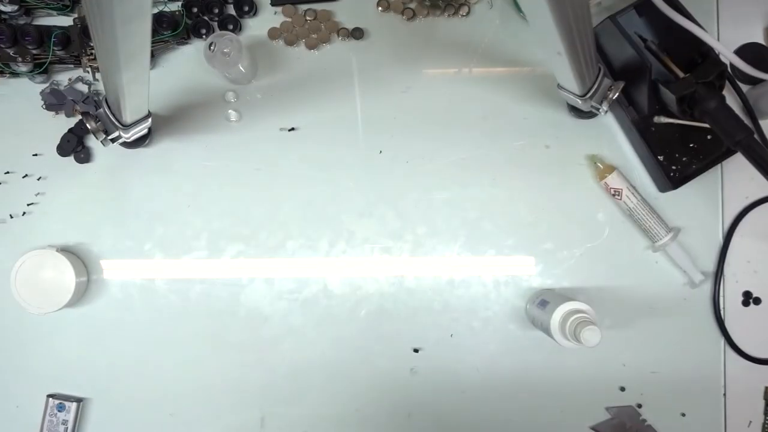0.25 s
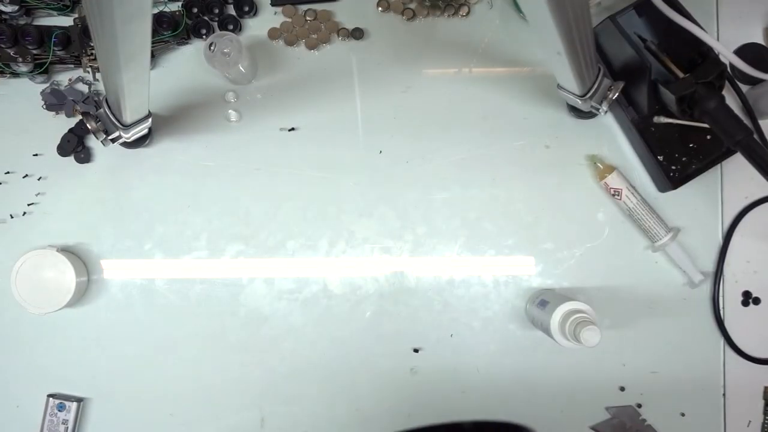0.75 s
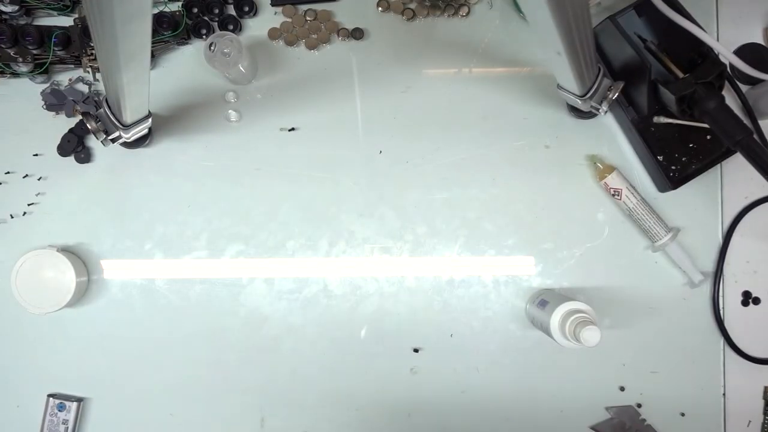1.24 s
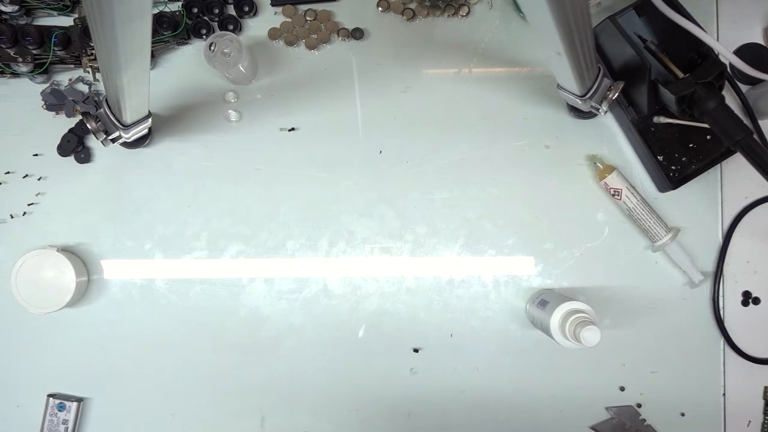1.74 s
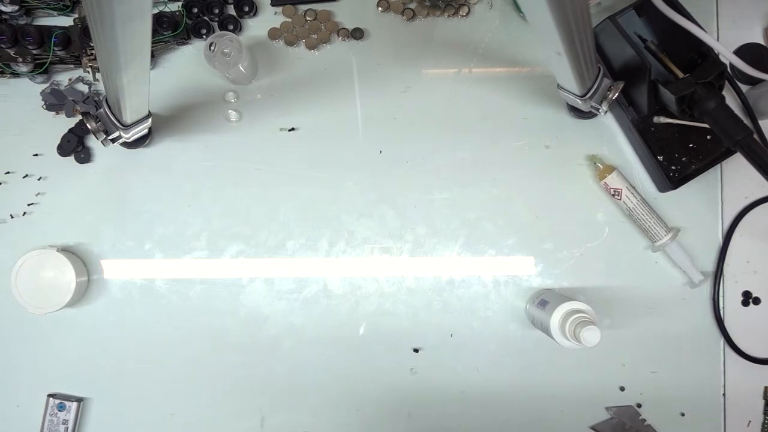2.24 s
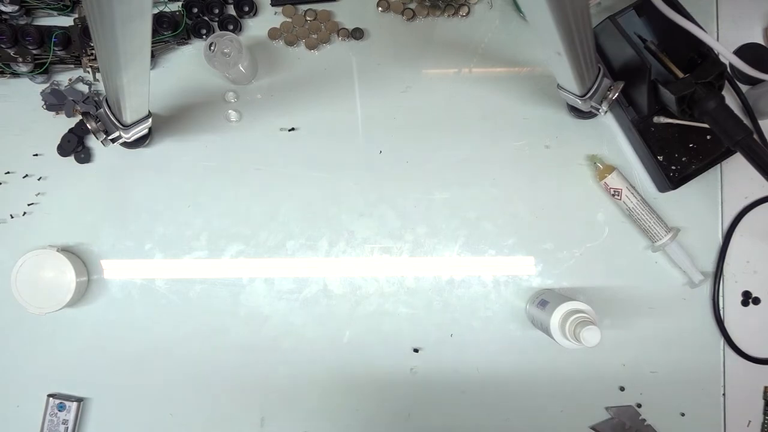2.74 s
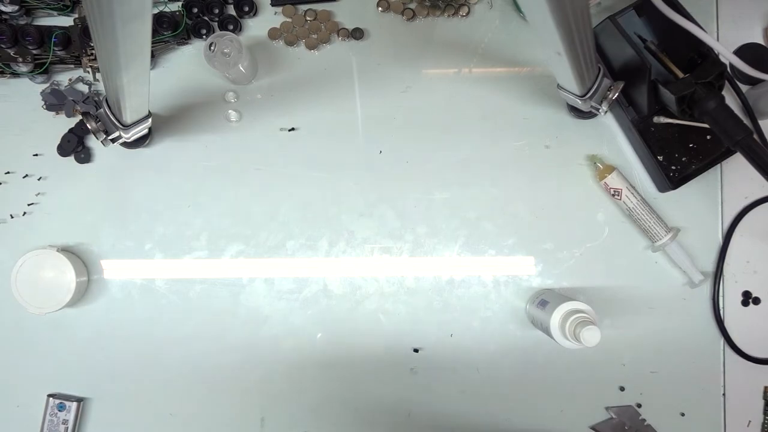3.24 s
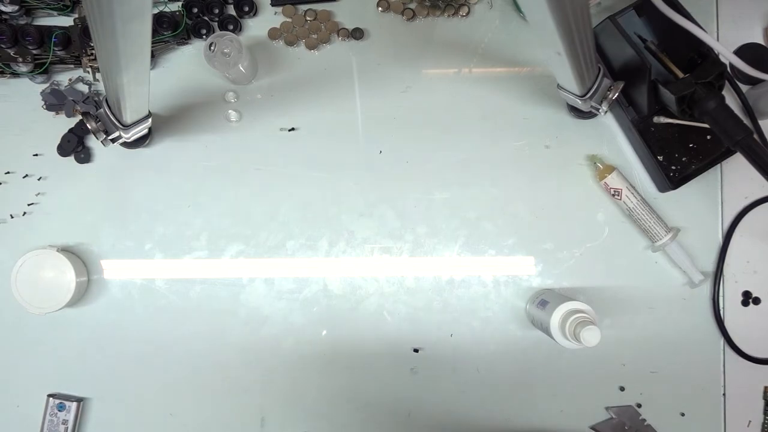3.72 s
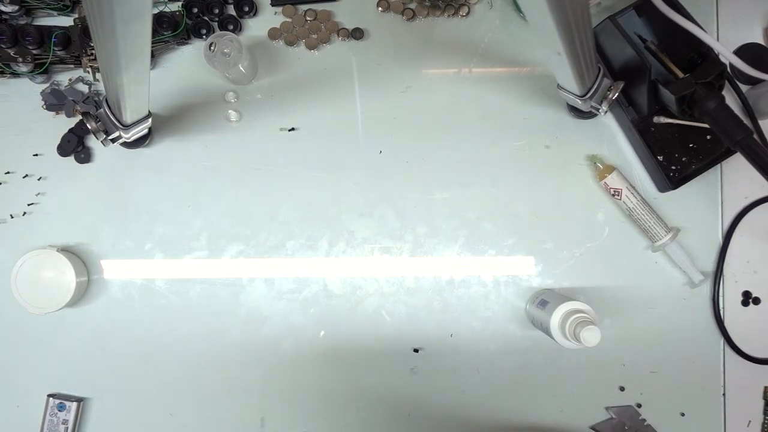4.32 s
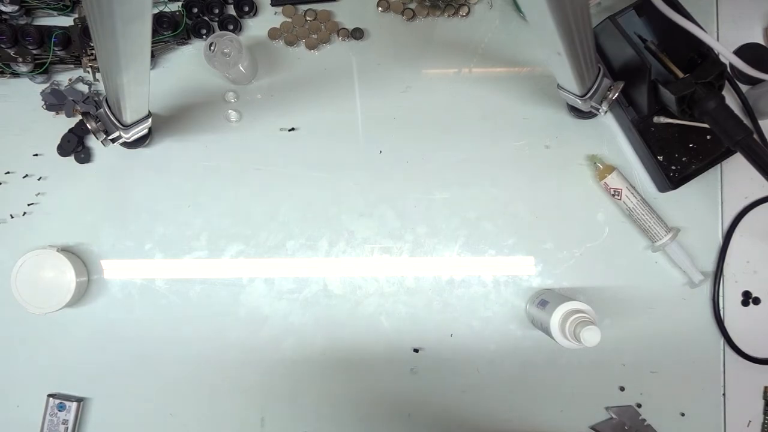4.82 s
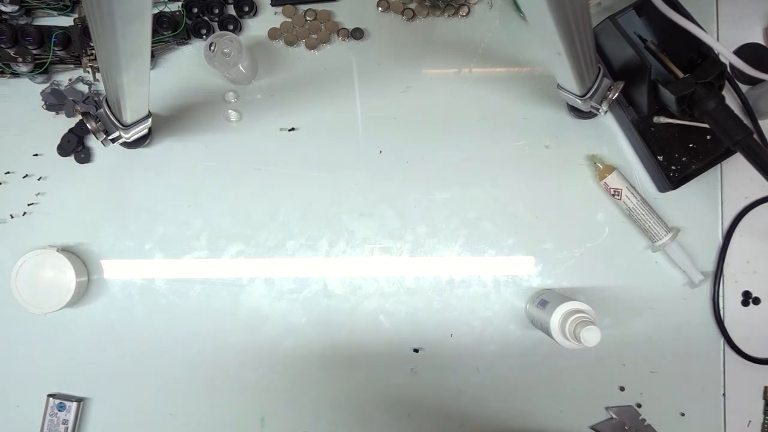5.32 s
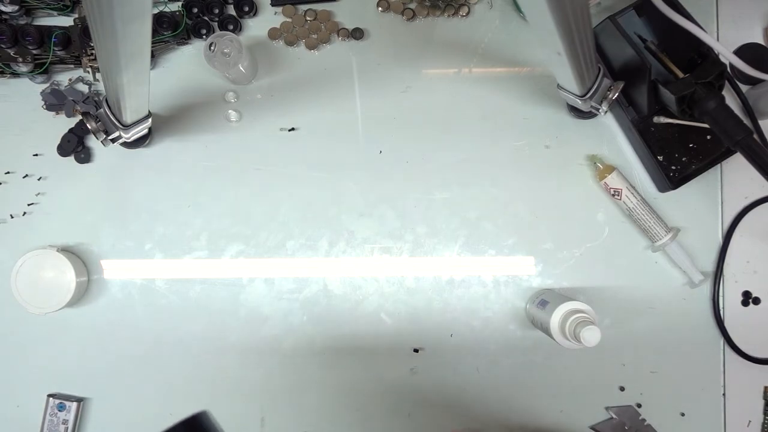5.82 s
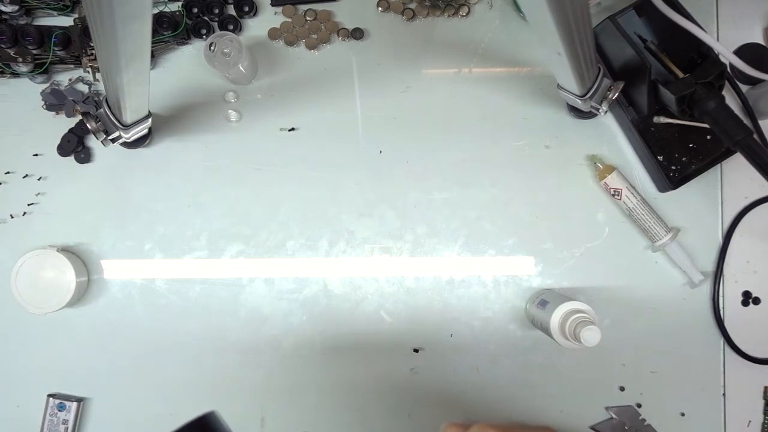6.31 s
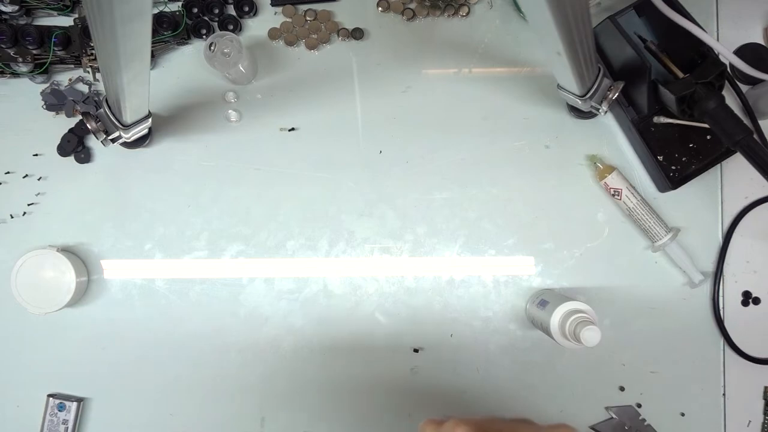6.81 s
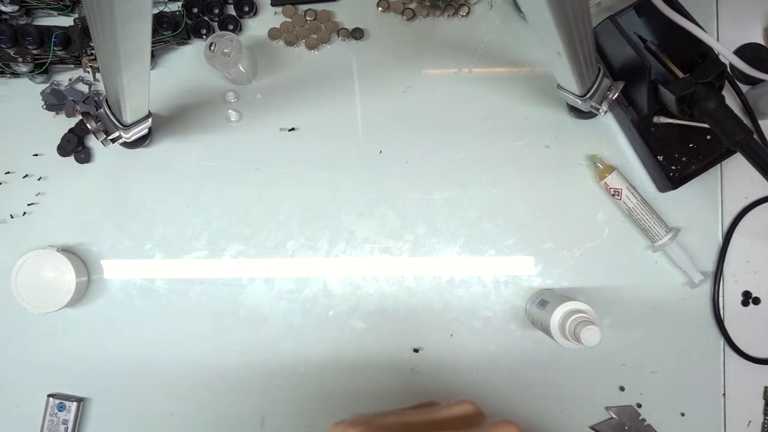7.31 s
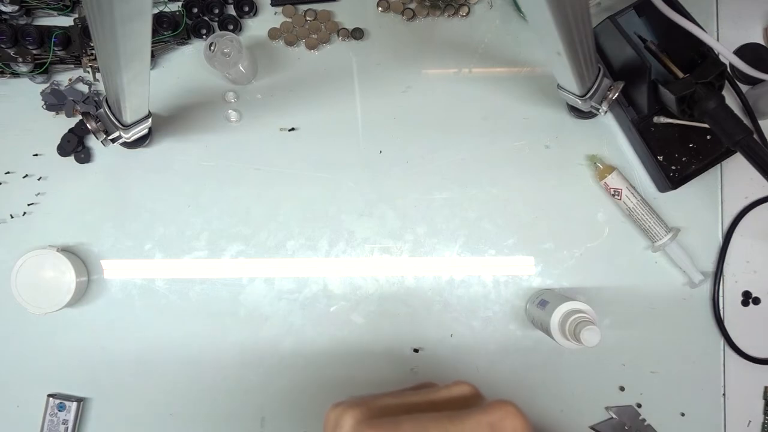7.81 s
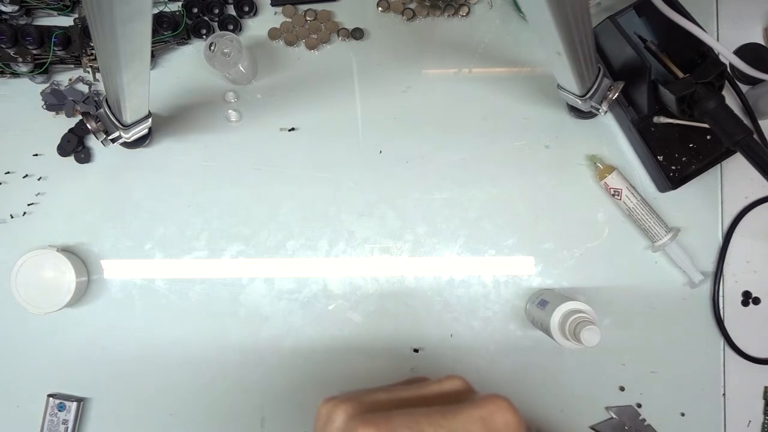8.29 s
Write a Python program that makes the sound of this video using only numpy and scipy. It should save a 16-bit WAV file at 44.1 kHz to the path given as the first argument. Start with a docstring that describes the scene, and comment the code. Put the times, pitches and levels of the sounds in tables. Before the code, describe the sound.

Very close, a small lens motor drives plastic gears in seven short runs over about eight seconds, alternating outward and inward. Each is a grainy, whining buzz that starts abruptly, holds nearly steady and stops with a tiny dull thud. Brief clicks and gear chatter fall in the gaps. Behind lie a quiet workshop's low rumble and faint hum, with barely audible finger rustles and one distant hoot near the end.

```python
"""Camera lens hunting for focus

On a workbench, a tiny motor drives a plastic gear train in seven short runs, outward and inward by turns.
Teeth knock, rub and whine; a tight spot on one wheel makes the speed wobble, more strongly inward.
Each run overshoots, cruises and sags a little. Around the runs the motor twitches, and after some stops
it brakes and corrects. Fingers rustle on the barrel. Behind it: room rumble, hum and one faint far hoot."""
import sys
import numpy as np
from scipy import signal
from scipy.fft import rfft, irfft, next_fast_len
from scipy.io import wavfile
from scipy.ndimage import uniform_filter1d

SR = 44100
rng = np.random.default_rng(int(sys.argv[2]) if len(sys.argv) > 2 else 0)


def master_out(mix):
    """Clip the mix to full scale and print it as 16-bit PCM to the path in sys.argv[1]."""
    frames = np.transpose(np.atleast_2d(mix))
    ceiling = np.clip(frames, -1, 1)
    pcm = np.round(ceiling * 32767).astype(np.int16)
    wavfile.write(sys.argv[1], SR, pcm)


N = 377047
TIME = np.arange(N) / SR  # seconds

TEETH = 7  # tooth contacts per shaft turn
BRAKE_LEAD_S = 0.088  # the brake current comes on this long before a correcting nudge

# resonances of the lens barrel: (pitch_hz, width_hz, driven_outward_db, driven_inward_db)
BARREL_RESONANCES = [(310, 27, 8.5, -6.5), (1388, 104, 11, 9), (1988, 138, 12, 15), (2784, 500, 6.5, 4.5),
                     (3220, 51, 6, 6), (4720, 190, -4, 6.5), (5120, 200, 1.5, 6.5), (6070, 600, 4, 5.5),
                     (6980, 720, 9.5, 13), (8540, 103, 7, 10), (9210, 450, 1.5, 7), (10060, 280, 4, 1.5),
                     (12800, 370, 0, 9.5), (13400, 390, -3.5, -4.5)]
# correcting nudges after a braked stop: (start_s, level_db)
CORRECTING_NUDGES = [(.962, -47), (1.555, -48.5), (2.521, -53.5), (3.834, -49), (5.86, -46.5)]


def gain_of(db):
    """Turns decibels into amplitude."""
    return 10 ** (np.asarray(db) / 20)


def evened(x):
    """Scales a signal to rms 1."""
    return x / np.sqrt(np.mean(x ** 2) + 1e-20)


def read(points, hz):
    """Reads a curve between its points, on a log-frequency axis."""
    f, value = np.transpose(points)
    return np.interp(np.log(hz + 1), np.log(f + 1), value)


def bell(t, centre, width):
    """A smooth hump of height 1."""
    return np.exp(-((t - centre) / width) ** 2)


def drift(rate_hz):
    """Smooth random motion of rms 1, up to about the given rate."""
    size = next_fast_len(N, real=True)
    hz = np.arange(0, 3 * rate_hz, SR / size)
    phases = np.exp(2j * np.pi * rng.random(size // 16)[:len(hz)])
    spectrum = phases * np.exp(-(hz[:len(phases)] / rate_hz) ** 2)
    return evened(irfft(spectrum, size)[:N])


def workshop(air_db=-51.5, hoot_hz=571, waver_db=0.97):
    """Room rumble is filtered noise; the hum and the far hoot are sines that waver."""
    # colour of the room rumble: (pitch_hz, relative_level_db)
    rumble_colour = [(12, -42), (20, -2), (54, 1.5), (92, -14), (122, -4.5), (175, -18.5), (245, -16.5),
                     (362, -24.5), (439, -25), (705, -27.5), (906, -32), (1230, -30), (1670, -36.5),
                     (6020, -43.5), (15500, -46.5)]
    # hum of appliances: (pitch_hz, level_db, wander_hz)
    hum_tones = [(48.8, -63.5, 4.3), (78.2, -63, 3), (119.9, -58.5, 0.56), (201.2, -74.5, 1.91),
                 (242.6, -78.5, 1.04), (282.5, -73, 2.67), (314.5, -74.5, 3.17), (353.7, -74, 2.13),
                 (1249, -76, 5.1)]
    # loudness of the hoot over time: (time_s, level_db)
    hoot_levels = [(7.03, -66), (7.12, -67), (7.18, -53.5), (7.24, -58), (7.31, -67), (7.42, -75)]

    hz = np.fft.rfftfreq(N, 1 / SR)
    noise = rfft(rng.standard_normal(N))
    air = evened(irfft(noise * gain_of(read(rumble_colour, hz)), N))

    hum = np.zeros(N)
    for f, db, wander in hum_tones:
        level = gain_of(db + waver_db * drift(2.8))
        hum += level * np.sin(2 * np.pi * np.cumsum(f + wander * drift(23.4)) / SR)

    # silent before the first point and after the last
    hoot_db = np.interp(TIME, *np.transpose(hoot_levels), left=-np.inf, right=-np.inf)
    hoot = gain_of(hoot_db) * np.sin(2 * np.pi * hoot_hz * TIME + drift(30))
    return gain_of(air_db) * air + np.sqrt(2) * (hum + hoot)


def barrel(x, knock, peaks_db, size=4096):
    """Rings impacts through the lens barrel: a filter with its resonances that never sounds early."""
    hz = abs(np.fft.fftfreq(size, 1 / SR))
    db = read(knock, hz)
    for (f, width, *_), peak in zip(BARREL_RESONANCES, peaks_db):
        db = db + peak / (1 + (2 * (hz - f) / width) ** 2)
    # the Hilbert transform finds the phases that put the ring after the blow
    log_spectrum = np.conj(signal.hilbert(db * np.log(10) / 20))
    ring = np.fft.ifft(np.exp(log_spectrum)).real[:size // 2]
    return signal.oaconvolve(x, ring / np.linalg.norm(ring))[:N]


def twitches(decay=0.0065, grain_db=2.5):
    """Brief motor nudges take up the slack in the gears: a few teeth chatter, as grainy noise."""
    # lone twitches of the motor: (start_s, length_s, level_db)
    lone_twitches = [(.184, 0.0017, -62), (1.279, 0.0035, -56.5), (1.473, 0.0066, -42.5),
                     (2.601, 0.0027, -58.5), (2.762, 0.0039, -47), (8.031, .031, -54)]
    # colour of the chatter: (pitch_hz, relative_level_db)
    colour = [(150, -5), (700, 4.0), (1400, 8.0), (2200, 3.0), (3100, -1.5),
              (4500, 0), (6900, -3.0), (9000, 0), (15000, -1)]
    nudge_s, settle_s, settle_db = .007, 0.027, -56.5
    creep_db = -66
    rise_s = .0025

    nudges = list(lone_twitches)
    for s, db in CORRECTING_NUDGES:
        nudges.append((s - BRAKE_LEAD_S, BRAKE_LEAD_S, creep_db))  # gears creep faintly under the brake
        nudges.append((s, nudge_s, db))
        nudges.append((s, settle_s, settle_db))  # softer chatter while the gears settle

    level = np.zeros(N)
    for s, length, db in nudges:
        rise = np.clip((TIME - s) / rise_s, 0, 1)
        fall = np.exp(-np.maximum(TIME - s - length, 0) / decay)
        level = np.maximum(level, gain_of(db) * rise * fall)
    chatter = evened(rng.standard_normal(N) * gain_of(grain_db * drift(700)))
    return barrel(level * chatter, colour, np.transpose(BARREL_RESONANCES)[2])


def motion(runs, wobble, stiff_at_s, overshoot_share, taut_power):
    """The motor spins up, overshoots, sags in a stiff stretch: shaft turns, wheel turns, drive, tooth load."""
    nominal_turns_per_s = 480
    wheel_turns = 18  # shaft turns for one turn of the slow wheel
    start_lack, spin_up_s, rise_s = .46, .013, .011  # start_lack: share of the speed missing at first
    overshoot, overshoot_at_s, overshoot_width_s = .027, .095, .05
    stiff_width_s = .085

    turns, wheel, drive, load = np.zeros((4, N))
    for on, off, db, extra, sag, tight, run_down, load_db in runs:
        span = (TIME >= on) & (TIME < off + .2)
        t = TIME[span] - on
        coast = np.maximum(TIME[span] - off, 0) / run_down
        # share of the cruising speed
        pace = (1 - start_lack * np.exp(-t / spin_up_s)) * np.exp(-.1 * coast)
        surge = overshoot_share * overshoot * bell(t, overshoot_at_s, overshoot_width_s)
        cruise = (nominal_turns_per_s + extra) * (1 + surge)
        speed = pace * (cruise - sag * bell(t, stiff_at_s, stiff_width_s))

        slow = np.cumsum(speed) / SR / wheel_turns
        wheel[span] = slow - np.interp(tight, TIME[span], slow)
        # the speed peaks in a cusp each time the tight spot lets go
        speed = speed * (1 + wobble * (2 / np.pi - abs(np.sin(np.pi * wheel[span]))))
        turns[span] = np.cumsum(speed) / SR

        drive[span] = gain_of(db) * (1 - np.exp(-t / rise_s)) * np.exp(-coast)
        # the high tones need full speed and taut teeth, which go slack once the current stops
        load[span] = gain_of(load_db) * pace ** taut_power * np.exp(-coast)
    return turns, wheel, drive, load


def rubbing(turns):
    """Noise of sliding teeth: worn patches come round every three shaft turns, the rest is ever new."""
    patches = signal.resample(rng.standard_normal(256), 1024)
    again = evened(np.interp(turns / 3 % 1, np.linspace(0, 1, 1024), patches))
    worn = .48  # amplitude share of the repeating part
    return worn * again + np.sqrt(1 - worn ** 2) * rng.standard_normal(N)


def gears(movement, knock, peaks_db, tones_db, rattle_db, play, uneven_db, rub, zing_db, zing_every):
    """Teeth knock and rub in the barrel, their mesh whines in sines, and the tight spot zings."""
    # steady tones of the gear train: (multiple of the shaft speed)
    tone_multiples = [2 / 3, 1, 5 / 3, 2, 3, 4, 14, 21, 26, 28]
    fade_db = 3  # slow swell of the highest tone; lower tones get less

    turns, wheel, drive, load = movement
    tooth = np.floor(turns * TEETH).astype(int)
    strikes = np.diff(tooth, prepend=0) > 0

    # tooth errors come round every four shaft turns, with an off-centre wheel
    errors = rng.standard_normal(4 * TEETH)
    tooth_error = evened(errors - errors.mean())[tooth % len(errors)]
    off_centre = np.sin(np.pi * turns / 2)
    force = gain_of(uneven_db * tooth_error + 0.48 * off_centre + 0.99 * drift(290))
    # backlash makes each blow differ
    blows = strikes * rng.uniform(-0.99, 1.89, N) / np.sqrt(strikes[drive > .5].mean())
    contact = evened(force * (blows + rub * rubbing(turns)))
    rattle = gain_of(rattle_db) * barrel(drive * contact, knock, peaks_db)

    # play between the teeth blurs the high tones more than the low ones
    angle = turns + play * drift(300) + .005 * drift(25)
    whine = np.zeros(N)
    for k, db in zip(tone_multiples, tones_db):
        height = k / tone_multiples[-1]  # 1 for the highest tone
        level = gain_of(db + 1.6 * drift(90) + drift(7) + fade_db * height * drift(2))
        whine += load ** height * level * np.sin(2 * np.pi * k * angle + .25 * drift(60))

    # wheel turns to the nearest zing
    from_spot = ((wheel / zing_every + .5) % 1 - .5) * zing_every
    zing_level = gain_of(zing_db + 2 * np.tanh(drift(21))) * bell(from_spot, 0, 0.041)
    zing = zing_level * np.sin(2 * np.pi * np.cumsum(7100 + 90 * drift(90.0)) / SR)
    return rattle + drive * (np.sqrt(2) * whine + np.minimum(load, 1) * zing)


def holding(chop_hz=2930, waver_hz=130):
    """Under the brake, the chopped drive current makes the stalled motor sing thinly."""
    brake_s, brake_db = 0.127, -66.5  # outlasts the nudge
    braked = np.zeros(N)
    for s, _ in CORRECTING_NUDGES:
        start = s - BRAKE_LEAD_S
        braked += (TIME > start) & (TIME < start + brake_s)
    # averaging over 400 samples softens the edges
    level = uniform_filter1d(gain_of(brake_db) * braked, size=400) * gain_of(3.5 * drift(80))
    return level * np.sin(2 * np.pi * (chop_hz * TIME + np.cumsum(waver_hz * drift(153)) / SR))


def bumps(runs, db, body_hz=305, decay=0.0043):
    """A dull thud of the lens body, a dying sine, each time the moving glass stops."""
    out = np.zeros(N)
    for _, off, *_ in runs:
        t = np.maximum(TIME - off, 0)
        out += (1 - np.exp(-t / 0.0013)) * np.exp(-t / decay) * np.sin(2 * np.pi * body_hz * t)
    return gain_of(db) * out


def gripped(x):
    """The hand's changing grip shifts the barrel's colour: bands of sound are raised or lowered over time."""
    # the grip over time: (time_s, low_resonance_freedom_db, treble_db)
    grip_changes = [(.6, 0.5, 3.5), (2.1, -1.5, -3), (3.4, 0, 5.5), (4.3, 0, -1.5), (5.45, -4.5, 6),
                    (6.45, -3, -2), (7.6, -7.5, 7)]
    # bands that follow the freedom: (low_hz, high_hz, share of the freedom; negative moves the other way)
    freedom_bands = [(1216, 1660, 0.97), (1900, 2200, 0.65), (2440, 2560, -0.52)]

    s, freedom_db, treble_db = np.transpose(grip_changes)
    shifts = [((lo, hi), share * freedom_db) for lo, hi, share in freedom_bands]
    shifts.append(((4900, 6300), treble_db))
    for band_hz, db in shifts:
        part = signal.sosfilt(signal.butter(1, band_hz, "bandpass", fs=SR, output="sos"), x)
        x = x + (gain_of(np.interp(TIME, s, db)) - 1) * part
    return x


def fingers():
    """Skin slides faintly on the barrel: soft swells of hiss, about an octave wide."""
    # finger shifts: (centre_s, swell_width_s, level_db, pitch_hz)
    rustles = [(1.02, .04, -67, 6000), (7.017, .012, -66, 5600), (7.04, .015, -66, 2500),
               (7.23, .03, -71, 6300), (8.258, 0.014, -67, 2940), (8.48, .05, -69, 6960)]
    out = np.zeros(N)
    for s, length, db, hz in rustles:
        edges_hz = [hz / np.sqrt(2), hz * np.sqrt(2)]
        band = signal.butter(2, edges_hz, "bandpass", fs=SR, output="sos")
        hiss = evened(signal.sosfilt(band, rng.standard_normal(N)))
        out += gain_of(db) * bell(TIME, s, length) * hiss
    return out


def room(x):
    """A diffuse tail of fading noise that dies at its own pace at each pitch, slowest in the bass."""
    # time to fade by 60 dB: (pitch_hz, fade_s)
    fade_times = [(200, 0.54), (2000, 0.2), (6500, 0.26), (9000, 0.12), (15000, 0.2)]
    hz, t, z = signal.stft(rng.standard_normal(SR // 2), SR, nperseg=256)
    fading = z * gain_of(-60 * t / read(fade_times, hz)[:, None])
    tail = signal.istft(fading, SR, nperseg=256)[1]
    return signal.fftconvolve(x, tail / np.linalg.norm(tail))[:N]


def scene():
    """The lens close by, in a quiet room."""
    # one row a run: (start_s, stop_s, level_db, extra speed in turns/s, speed lost in the stiff stretch
    # in turns/s before spin-up, tight_spot_s, run_down_s, load_db of the highest tone)
    runs_out = [(.284, 0.885, -.5, -3, 16.5, .783, .0079, -2.5),
                (3.019, 3.751, -0.76, 4, 9.2, 3.47, 0.0077, -18),
                (5.123, 5.78, -0.17, 9, 9, 5.528, 0.0079, 0.5),
                (7.421, 7.778, -0.1, 7.5, 10, 6.95, 0.0097, 1)]
    runs_in = [(1.71, 2.446, -.1, 0.98, 3, 2.17, 0.0043, 0.052),
               (3.999, 4.641, -0.91, 6.3, 6.6, 4, 0.016, -0.82),
               (6.160, 6.762, 0.17, 6, 6, 6.495, 0.016, -0.37)]
    # colour of the tooth knocks: (pitch_hz, relative_level_db)
    knock_out = [(100, -9.5), (300, -7.5), (650, -8), (1100, 1), (1700, -0.5), (2300, -5), (3300, -8),
                 (4400, -4), (6000, -7.5), (7600, -2.5), (9500, 1), (11300, 0), (13500, 5), (15700, -4.5)]
    knock_in = [(100, -11.5), (280, 5.5), (450, -7.5), (750, -0.5), (1150, -1), (1700, 4), (2300, -6),
                (3500, -9), (4400, -6), (5700, -6.5), (7800, -3), (9400, 2), (11200, 0.5), (13300, 3),
                (15700, -4)]
    # levels of the gear tones, lowest tone first: (level_db before drive and load)
    tones_out_db = [-69, -64, -78, -74, -48, -61, -48.5, -53.5, -68, -55.5]
    tones_in_db = [-61.5, -76, -71, -60, -49, -57, -45, -47, -53, -48]

    _, _, peaks_out_db, peaks_in_db = np.transpose(BARREL_RESONANCES)
    going_out = motion(runs_out, wobble=.007, stiff_at_s=.35, overshoot_share=.65, taut_power=8)
    going_in = motion(runs_in, wobble=.017, stiff_at_s=.47, overshoot_share=1, taut_power=3)
    # zing_every counts turns of the slow wheel
    outward = gears(going_out, knock_out, peaks_out_db, tones_out_db, rattle_db=-38.0, uneven_db=1.0,
                    rub=1.31, play=.005, zing_db=-35, zing_every=2)
    inward = gears(going_in, knock_in, peaks_in_db, tones_in_db, rattle_db=-40.5, uneven_db=-0.26,
                   rub=1.34, play=.002, zing_db=-39, zing_every=1)
    stops = bumps(runs_out, db=-38) + bumps(runs_in, db=-37.5)
    lens = gripped(outward + inward + twitches() + holding() + stops) + fingers()
    return (lens + gain_of(-12.5) * room(lens) + workshop())[None]


def record(dry):
    """The band limit of the recorder: a steep filter removes the highest treble."""
    edge_hz = 15750
    lowpass = signal.firwin(801, edge_hz, window=("kaiser", 8), fs=SR)
    return signal.oaconvolve(dry, lowpass[None], "same")


dry = scene()
out = record(dry)
master_out(out)
```